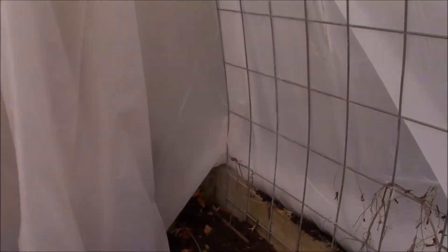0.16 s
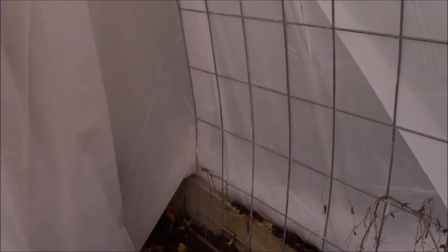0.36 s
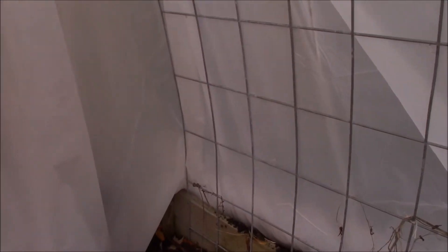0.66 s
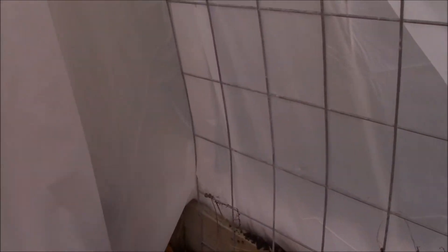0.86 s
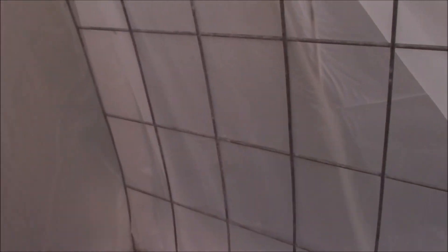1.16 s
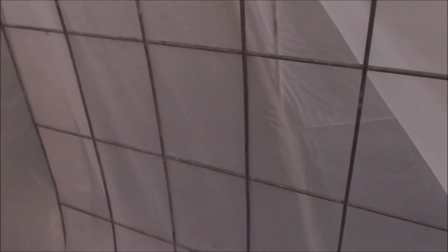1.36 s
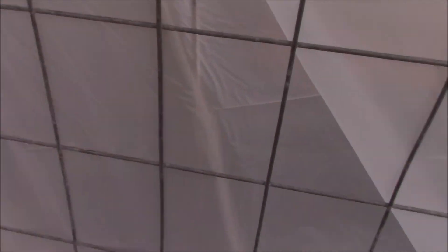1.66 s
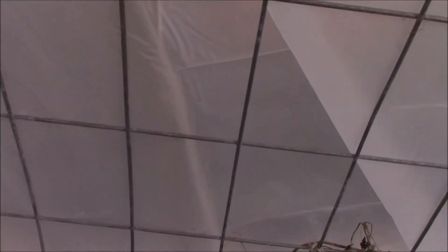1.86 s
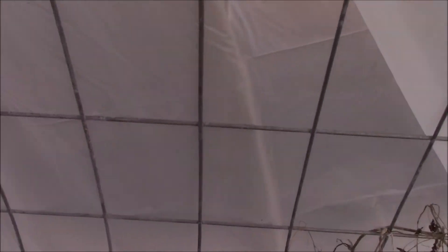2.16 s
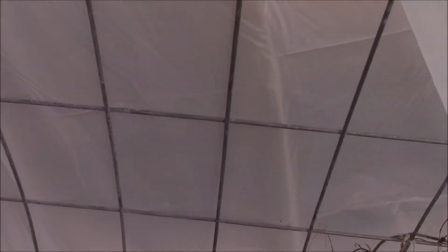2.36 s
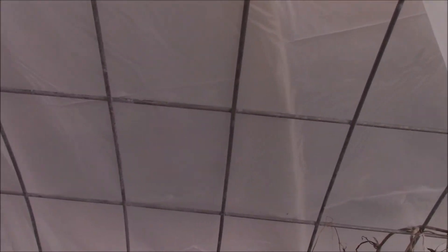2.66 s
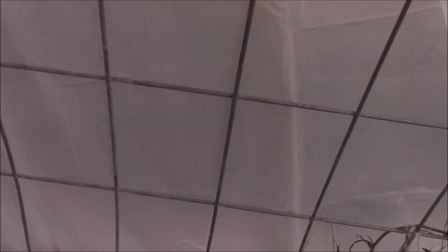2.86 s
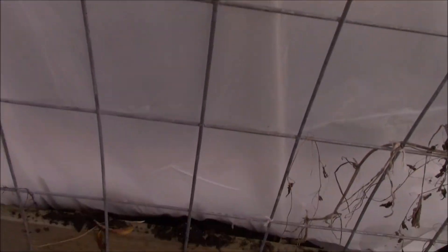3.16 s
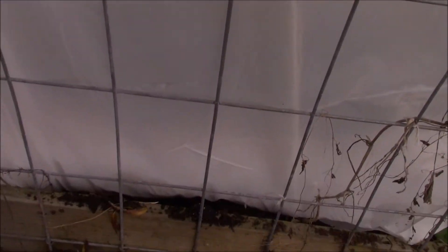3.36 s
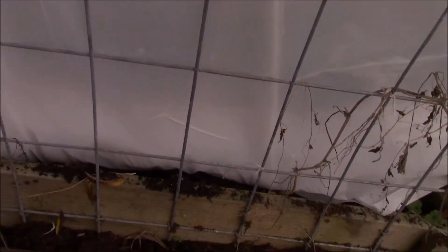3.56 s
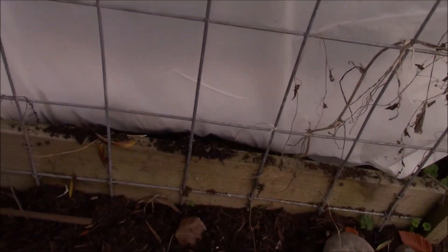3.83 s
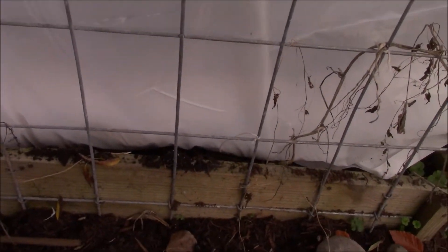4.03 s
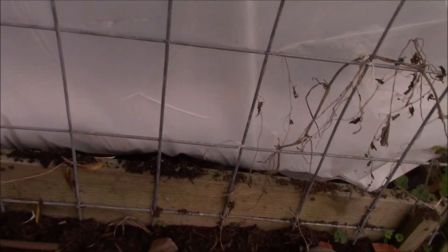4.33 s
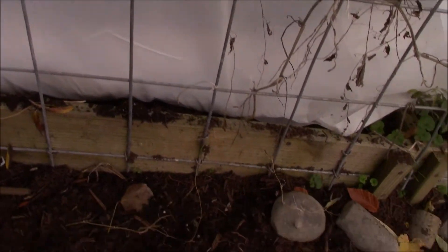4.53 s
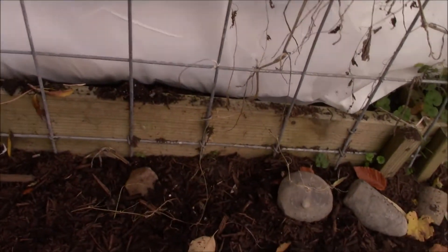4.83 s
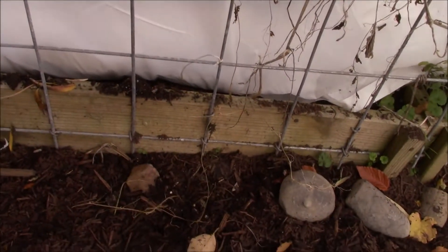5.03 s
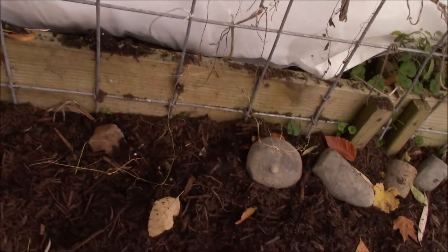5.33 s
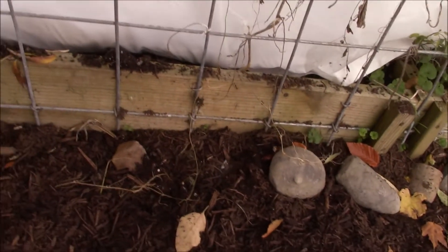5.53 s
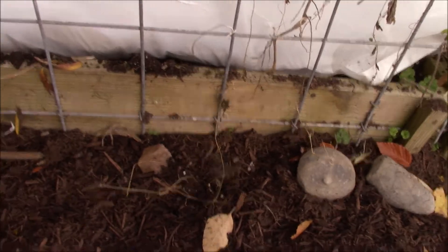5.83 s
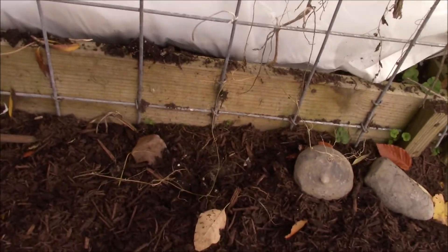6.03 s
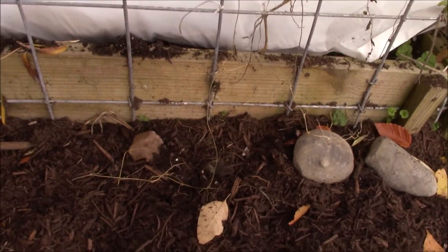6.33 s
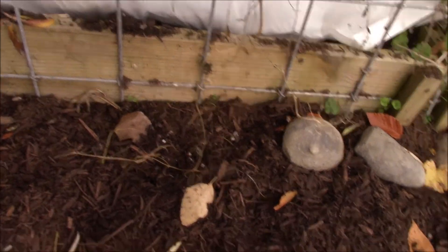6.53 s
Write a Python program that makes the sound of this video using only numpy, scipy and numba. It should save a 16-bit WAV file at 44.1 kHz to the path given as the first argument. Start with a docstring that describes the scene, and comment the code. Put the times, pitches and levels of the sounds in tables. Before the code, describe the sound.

A few faint ticks, then plastic sheeting rustles and crinkles loudly in repeated tugs, close up inside a greenhouse.

```python
"""A dull outdoor murk of wind and traffic, and a few faint ticks from a slack plastic sheet.
Then the wide sheet is pulled and crumpled right next to the microphone, inside a sheeted hoop house.
Each fold buckles in a quick run of pops, wide patches low and fine creases high.
Film hisses over film with every tug, and the walls throw it all back."""
import sys
import numpy as np
from scipy import signal
from scipy.fft import rfft, irfft
from scipy.io import wavfile
from scipy.ndimage import uniform_filter1d, minimum_filter1d
from numba import njit

SR = 44100
rng = np.random.default_rng(int(sys.argv[2]) if len(sys.argv) > 2 else 0)


def wav_record(signal):
    """Record a signal, one row per channel, as 16-bit PCM in the file named by sys.argv[1]."""
    frames = np.transpose(np.atleast_2d(signal))
    bounded = np.clip(frames, -1, 1)
    # unit amplitude maps onto the largest positive 16-bit level
    quanta = np.round(bounded * 32767).astype(np.int16)
    wavfile.write(sys.argv[1], SR, quanta)


N = 295337
EDGES_HZ = 250, 1100, 4200, 15500  # bounds of three bands: hollow flaps, patches, fine creases


def undb(db):
    return 10 ** (np.asarray(db) / 20)


def at_rms(x, db):
    return x * undb(db) / np.sqrt(np.mean(x ** 2))


def db_at(curve, hz):
    """Level of a spectrum curve, joined on a log-frequency axis."""
    curve_hz, db = np.transpose(curve)
    return np.interp(np.log(hz), np.log(curve_hz), db)


def noise_spectrum(curve):
    """Spectrum of a noise shaped by the curve, and its frequencies."""
    hz = np.fft.rfftfreq(N, 1 / SR) + 1
    return rfft(rng.standard_normal(N)) * undb(db_at(curve, hz)), hz


def flicker(rate_hz):
    """Random steps, smoothed twice; spread near 1."""
    hold = int(SR / rate_hz)
    steps = np.repeat(rng.standard_normal(N // hold + 1), hold)
    return 1.5 * uniform_filter1d(uniform_filter1d(steps, hold), hold)[:N]


# Spectrum of the distant outdoors, heard from inside the house: frequency_hz, relative_db
MURK_SPECTRUM = [(18, -78), (30, -26), (112, -6.5), (149, 1.5), (252, 8), (760, 10.5), (1960, 0),
                 (5900, -8), (12600, -18.5), (16000, -32)]


def outdoor_murk(level_db=-45.5, flicker_db=1.2):
    """Far wind and traffic: half-octave bands of noise, each flickering a little."""
    spectrum, hz = noise_spectrum(MURK_SPECTRUM)
    out = 0
    for centre_hz in 30 * 2 ** np.arange(0, 9.6, .5):
        share = np.clip(1 - np.abs(2 * np.log2(hz / centre_hz)), 0, 1)
        out = out + undb(flicker_db * flicker(4.4)) * irfft(spectrum * share, N)
    return at_rms(out, level_db)


def hoop_house(direct, t60_s=.036, tail_db=-12, shift_s=.06, tails=10):
    """The walls add a short dense tail; the sheet keeps moving, so each moment meets other reflections."""
    t = np.arange(int(.3 * SR)) / SR
    position = np.arange(N) / SR / shift_s
    out = direct
    for k in range(tails):
        tail = rng.standard_normal(len(t)) * undb(-60 * t / t60_s) * np.minimum(t / .00024, 1)
        tail = signal.lfilter([1], [1, -.3], tail)  # slightly dulled
        tail *= undb(tail_db) / np.sqrt(np.sum(tail ** 2))
        crossfade = np.clip(1 - np.abs((position - k) % tails - 1), 0, 1)
        out = out + signal.oaconvolve(direct * np.sqrt(crossfade), tail)[:N]
    return out


@njit
def pops(start_s, hz, cycles, size, rise_cycles):
    """Each pop is a sine that swells quickly and dies by 60 dB within its count of cycles."""
    out = np.zeros(N)
    for k in range(len(start_s)):
        first, length = int(start_s[k] * SR), int(cycles[k] * SR / hz[k]) + 2
        ring, ring_step = size[k] + 0j, np.exp(2j * np.pi * hz[k] / SR - np.log(1000) / length)
        shut, shut_step = 1., np.exp(-hz[k] / SR / rise_cycles)
        for i in range(first, min(first + length, N)):
            out[i] += ring.imag * (1 - shut) ** 2
            ring *= ring_step
            shut *= shut_step
    return out


# Spectrum of the plastic close up, colouring its folds and its hiss: frequency_hz, relative_db
SHEET_SPECTRUM = [(88, -50), (150, -30), (227, -17), (461, -9), (666, -2), (1900, 1), (2980, -2),
                  (5170, -9), (6770, -10), (8000, -15.5), (13300, -24), (16000, -37)]


def folds(start_s, db, lo_hz, hi_hz, count, run_s, cycles):
    """A fold buckles in a run of pops, one per size of patch between two pitches; run_s is their mean lag."""
    pitch_draw, lag_draw, ring_draw, sign_draw = rng.random((len(start_s), count, 4)).transpose(2, 0, 1)
    hz = lo_hz * (hi_hz / lo_hz) ** ((np.arange(count) + pitch_draw) / count)
    pop_s = start_s[:, None] - np.reshape(run_s, (-1, 1)) * np.log(1 - lag_draw)
    ring_cycles = cycles * (.5 + ring_draw)
    # high pops are short and thinly spread over the hertz, so each is stronger by its pitch
    size = undb(db[:, None] + db_at(SHEET_SPECTRUM, hz)) * hz / 1600 * np.sign(sign_draw - .5)
    return pops(pop_s.ravel(), hz.ravel(), ring_cycles.ravel(), size.ravel(), rise_cycles=.25)


# The slack sheet ticking near the microphone: start_s, patch_gain_db, pitch_hz, crease_gain_db, run_s
CRINKLES = [(0.045, -41, 3000, -42, 0.0074), (0.105, -34, 2280, -37.5, 0.02),
            (0.135, -28.5, 1520, -40, 0.0043), (0.263, -20.5, 2750, -37, 0.00082),
            (0.269, -33.5, 2580, -40, 0.0045), (0.383, -57, 3500, -51, 0.00055),
            (0.629, -39, 3800, -37, 0.005), (0.637, -35, 2040, -32.5, 0.0052),
            (0.801, -36, 3000, -40.5, .12), (0.942, -33, 1960, -41, 0.0026), (0.96, -30, 2700, -39, 0.0021),
            (1.125, -47, 2500, -50, .003), (1.231, -44, 2400, -48, 0.0044),
            (1.301, -30.5, 2130, -38, 0.0047)]


def crinkles():
    """Faint runs of pops before the pull, gathered round one patch size, with fine creases on top."""
    start_s, patch_db, hz, crease_db, run_s = np.transpose(CRINKLES)
    hz = hz[:, None]
    patches = folds(start_s, patch_db, hz / 1.43, hz * 1.35, count=24, run_s=run_s, cycles=9.2)
    creases = folds(start_s, crease_db, *EDGES_HZ[2:], count=80, run_s=run_s, cycles=12)
    return patches + creases


# Tugs at the sheet, right by the microphone; flaps and creases are relative to the patches:
# start_s, length_s, patch_start_db, patch_end_db, flap_offset_db, crease_offset_db
TUGS = [(1.418, 0.085, -21.5, -19.5, -3.5, -11.5), (1.541, 0.13, -19, -14.5, -8.5, -7),
        (1.705, 0.23, -15, -20.5, -7.5, -7), (1.968, 0.085, -16, -16.5, -6.5, -11.5),
        (2.139, .17, -14.5, -15.5, -7, -6.5), (2.395, 0.16, -20.5, -23, -3.5, -10),
        (2.615, 0.092, -21.5, -20.5, -6.5, -10.5), (2.752, .04, -25.5, -26, -3, -16),
        (2.805, 0.12, -21, -15.5, -6, -5), (2.987, 0.13, -17, -12.5, -10, -8),
        (3.157, .11, -12.5, -15, -7.5, -5.5), (3.354, .32, -16, -13.5, -6.5, -9),
        (3.742, 0.16, -26.5, -29, -4, -9.5), (3.973, 0.038, -26, -27.5, -7, -10),
        (4.032, 0.035, -26.5, -26.5, -2, -3.5), (4.09, 0.041, -28.5, -34.5, -5, -6.5),
        (4.174, 0.062, -21, -19, -12, -5), (4.223, 0.02, -18, -15, -4.5, -8),
        (4.376, 0.2, -24.5, -15, -7.5, -6), (4.65, 0.1, -23, -24, -7, -7.5),
        (4.812, 0.062, -23, -24.5, -5, -7), (4.939, .21, -17.5, -18, -6.5, -7.5),
        (5.217, .13, -30.5, -23.5, -3.5, -8.5), (5.42, 0.099, -40, -46.5, 4, -30),
        (5.573, 0.27, -24.5, -16.5, -6.5, -14), (5.853, .1, -17, -20, -4.5, -8),
        (5.988, .17, -29.5, -31.5, -2.5, -6), (6.259, 0.017, -24, -35, -4, -12),
        (6.323, 0.065, -25.5, -15, -5.5, -6.5), (6.454, 0.22, -28, -26.5, -4, -8.5)]


def tug_gains(now_s, take_up_db_per_s=244, let_go_db_per_s=251):
    """Gains of flaps, patches and creases: each tug swells, ramps between its two levels and is let go."""
    power = 0
    for start_s, length_s, start_db, end_db, flap_db, crease_db in TUGS:
        db = np.interp(now_s, [start_s, start_s + length_s], [start_db, end_db])
        db -= take_up_db_per_s * np.maximum(start_s - now_s, 0)
        db -= let_go_db_per_s * np.maximum(now_s - start_s - length_s, 0)
        power = power + (undb(db) * undb([[flap_db], [0], [crease_db]])) ** 2
    return np.sqrt(power)


def rustle(folds_per_s=500, scatter_db=2, hiss_db=(0, -3.5, -3), flicker_db=1.5):
    """Countless small uneven folds over the hiss of film sliding on film; both surge with each tug."""
    now_s = np.arange(N) / SR
    gaps, sizes = -np.log(1 - rng.random((9000, 2))).T
    fold_s = np.cumsum(gaps / folds_per_s)
    fold_db = np.minimum(scatter_db * sizes, 9.5)
    heard = fold_s < N / SR
    spectrum, hz = noise_spectrum(SHEET_SPECTRUM)
    out = 0
    for band, gain in enumerate(tug_gains(now_s)):
        lo_hz, hi_hz = EDGES_HZ[band:band + 2]
        crackle = folds(fold_s[heard], fold_db[heard], lo_hz, hi_hz, count=4, run_s=.0014, cycles=8)
        in_band = (hz >= (lo_hz if band else 0)) & (hz < hi_hz)
        hiss = irfft(spectrum * in_band, N)
        out = out + gain * at_rms(at_rms(crackle, 0) + at_rms(hiss, hiss_db[band]), 0)
    moving = now_s > SNAPS[0][0]  # the first snap sets the sheet going
    return moving * out * undb(flicker_db * flicker(40))


# Single folds that stand out, right at the microphone: start_s, gain_db, pitch_hz, crease_gain_db
SNAPS = [(1.3785, -5, 1250, -36), (1.6092, 1, 1420, 0), (1.79, 0, 1380, 6), (1.8427, -2.5, 1580, -29),
         (1.8762, -3, 2040, -1), (2.0124, -4.5, 1120, -5), (2.024, -8, 1530, -3), (2.2202, 0, 2330, 6),
         (2.2816, -6, 2200, 6), (2.3017, 4, 2650, -16), (2.3461, -0.5, 2800, -10), (2.39, -14, 774, -8),
         (2.401, -3, 3400, -6), (2.434, 0.5, 2560, -4), (2.5017, -3, 1610, -13), (2.5807, -0.5, 3600, -24),
         (2.6099, 5, 2970, -10), (2.663, -9, 1380, -12), (2.698, -2.5, 1430, -8), (2.8324, 4.5, 2400, 0),
         (3.204, -5, 1250, 4), (3.2373, 5, 3100, 6), (3.2616, -3, 2400, -7), (3.337, 2, 1770, -13),
         (3.3513, 6, 1950, 4), (3.4556, -13, 850, -3), (3.5686, 3, 3540, 6), (3.75, -15, 2410, -26),
         (3.7764, -0.5, 2860, -12), (3.8504, -11, 2630, -23), (3.8739, -11, 2580, -23),
         (3.98, -9, 3000, -16), (4.0318, -1.5, 3200, -6), (4.047, -8.5, 1740, -14),
         (4.0637, -2.5, 3240, -3.5), (4.145, -17, 2010, -16), (4.1607, -14, 1610, 0), (4.1844, 4, 2860, 4),
         (4.22, -7, 1090, -10), (4.243, -4, 860, -5), (4.282, -12, 4200, -17), (4.3167, -19, 3490, -16),
         (4.3844, -23, 1260, -9), (4.4946, 0, 2160, -3), (4.5159, 3, 3260, -12), (4.57, -2, 1410, 6),
         (4.6983, -4, 2520, -9), (4.8044, -15, 850, -9), (4.946, -4, 1360, -4), (5.0116, 3, 3000, 3),
         (5.1139, 1, 3000, -4), (5.296, -11, 2580, -14), (5.559, -16, 2490, -15), (5.5766, -9.5, 2740, -11),
         (5.6008, -4.5, 1420, -35), (5.6623, -0.5, 1830, -10), (5.697, -0.5, 2320, -3),
         (5.7716, -20, 3810, 0), (5.8222, 9, 2860, 6), (5.8688, 4.5, 2400, -4), (5.9179, -1, 1450, -1),
         (5.984, -9, 3000, -16), (6.0011, -9, 2500, -15), (6.014, -13, 2200, -22), (6.0372, -6, 3060, -9),
         (6.055, -4, 3700, -12), (6.0896, -4.5, 2640, -6), (6.1054, -11, 950, -24),
         (6.142, -8.5, 1390, -24), (6.153, -8, 1500, -23), (6.2061, -28, 1830, -37),
         (6.2368, -19, 1720, -19), (6.2535, -11, 1440, -6.5), (6.2688, -14, 2070, -14),
         (6.288, -6.5, 1960, -15), (6.321, -3.5, 1990, -12), (6.335, -7, 800, -16), (6.359, -2, 4260, -6.5),
         (6.397, -4.5, 780, -12), (6.431, -9.5, 3140, -9), (6.5313, -7, 3870, -14), (6.595, -14, 2500, -24),
         (6.6093, -6, 2860, -13), (6.6694, -14, 1130, -37)]


def snaps():
    """Large folds: the main patch pops first, then a run of lesser pops, wide and fine."""
    start_s, db, hz, crease_db = np.transpose(SNAPS)
    main = pops(start_s, hz, cycles=np.full(len(hz), 17.), size=undb(db), rise_cycles=.25)
    patches = folds(start_s, db - 12.5, 806, EDGES_HZ[2], count=8, run_s=.0022, cycles=15.5)
    creases = folds(start_s, crease_db - 4, *EDGES_HZ[2:], count=14, run_s=.0007, cycles=12)
    return main + patches + creases


def scene():
    """One microphone in the hoop house: the sheet close up, the walls around, the murk far outside."""
    # thin film moves too little air to sound below its widest patches
    low_cut = signal.butter(3, 200, "high", fs=SR, output="sos")
    sheet = signal.sosfilt(low_cut, rustle() + snaps() + crinkles())
    return (hoop_house(sheet) + outdoor_murk())[None]


def record(dry, ceiling=.97, window_samples=71, top_hz=15800):
    """A quick limiter behind the microphone holds down the loudest pops; the highest treble is cut."""
    gain = minimum_filter1d(ceiling / np.maximum(np.abs(dry), ceiling), window_samples)
    limited = dry * uniform_filter1d(gain, window_samples)
    return signal.sosfilt(signal.ellip(10, .2, 80, top_hz, fs=SR, output="sos"), limited)


dry = scene()
out = record(dry)
wav_record(out)
```